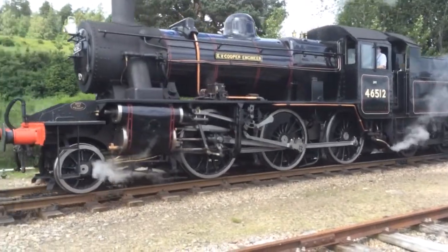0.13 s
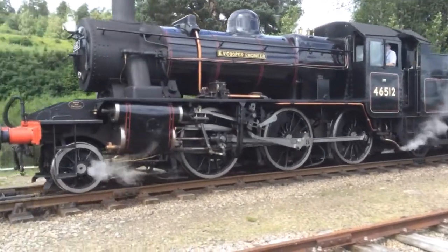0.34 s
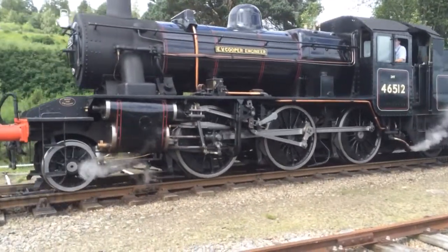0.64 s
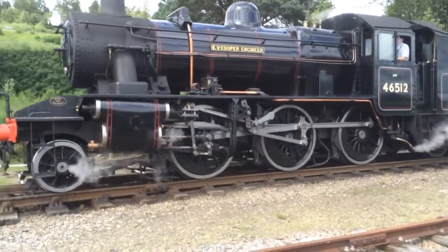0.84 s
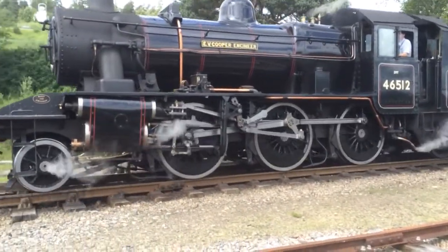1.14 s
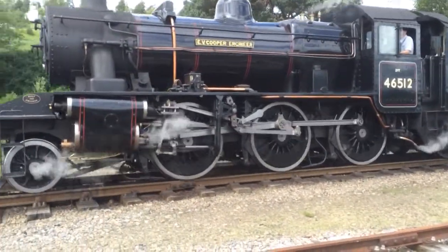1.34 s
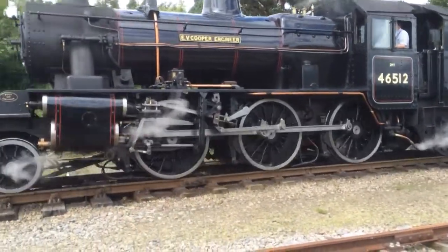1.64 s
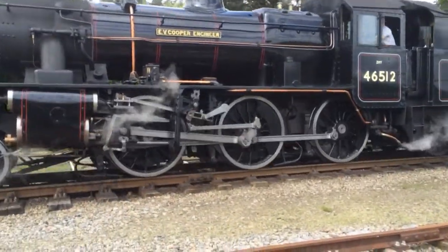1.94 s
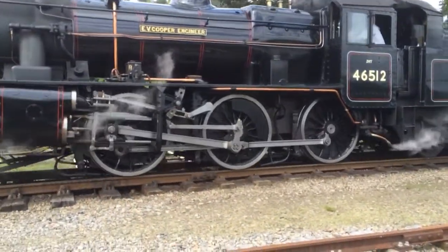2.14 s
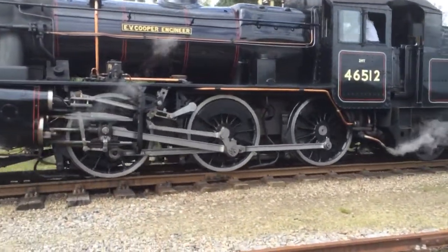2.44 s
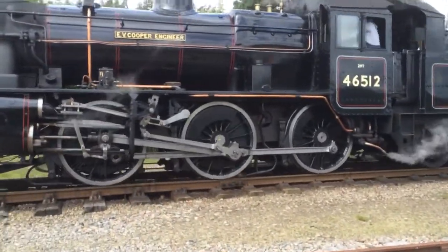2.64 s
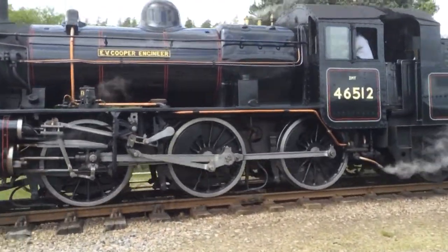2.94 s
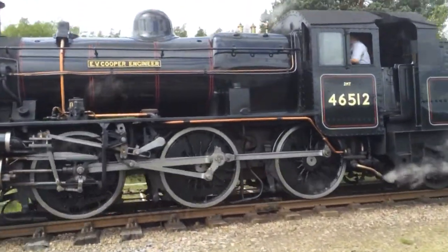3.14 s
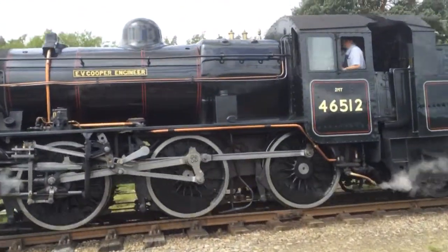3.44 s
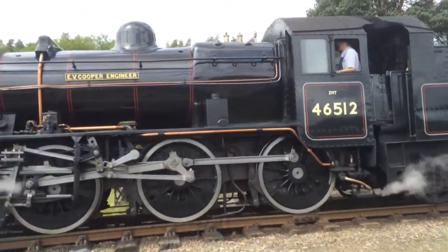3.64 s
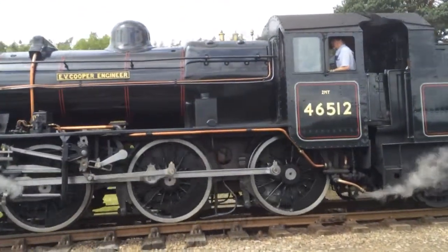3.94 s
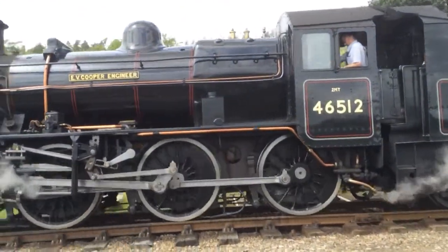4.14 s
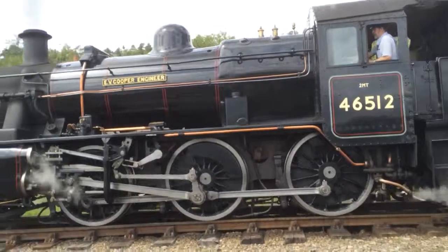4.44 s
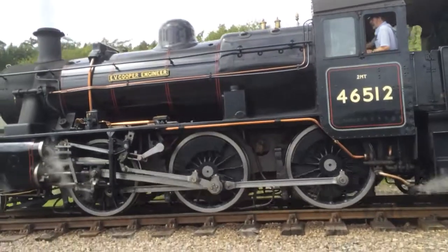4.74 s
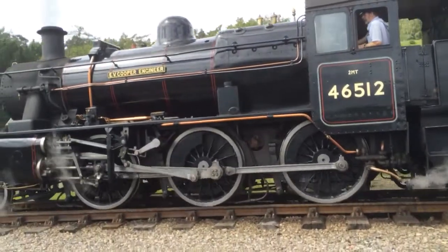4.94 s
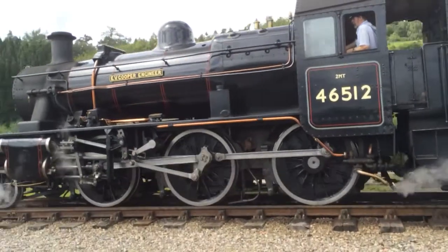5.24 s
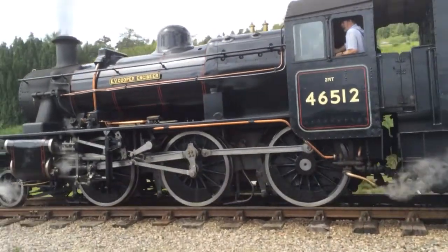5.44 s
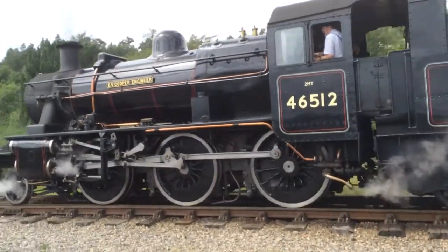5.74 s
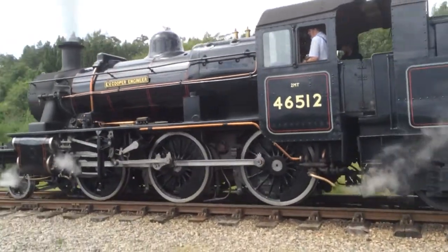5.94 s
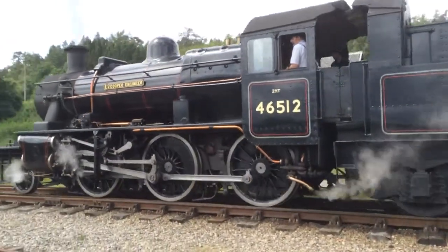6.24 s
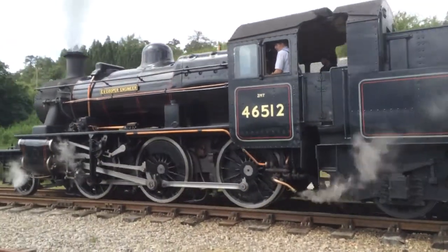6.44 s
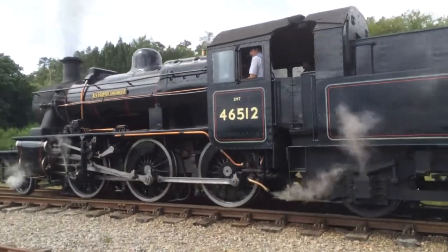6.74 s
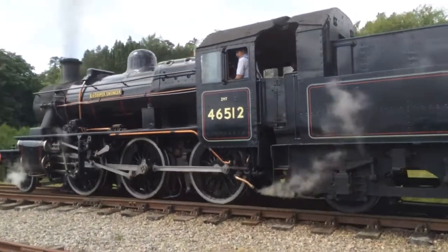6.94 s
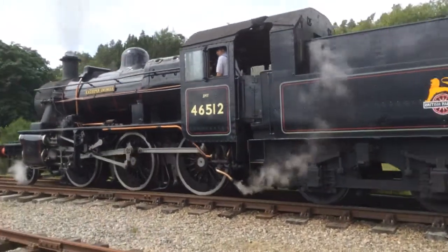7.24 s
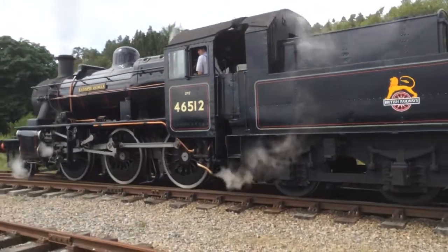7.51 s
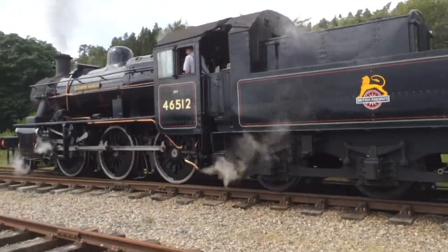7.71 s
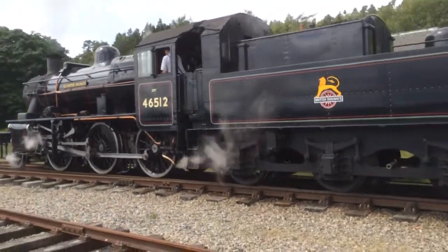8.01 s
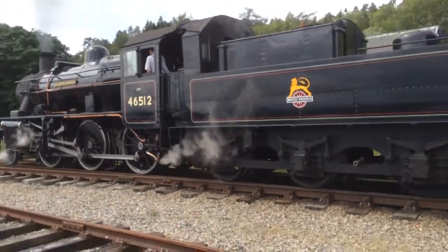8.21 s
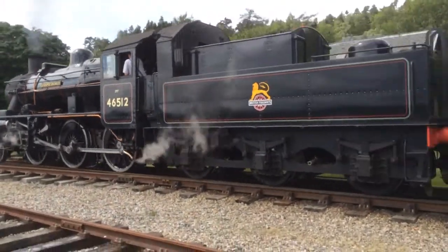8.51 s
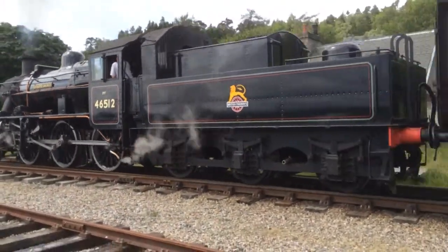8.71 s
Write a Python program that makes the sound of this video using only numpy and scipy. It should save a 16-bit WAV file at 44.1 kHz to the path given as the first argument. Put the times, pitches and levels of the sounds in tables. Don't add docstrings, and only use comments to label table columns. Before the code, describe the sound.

Outdoors beside the track, a steam locomotive gets under way. Hissing steam swells before each hollow, booming chuff, which roars briefly and echoes. Beats quicken from about three in two seconds to more than two a second. Metal rods clank and thin leaks whistle early on; low wheel rumble continues. The chimney gradually draws away, losing its boom while the blasts turn rougher and airier. Single-channel, close microphone, loud beats flattened.

```python
import sys
import numpy as np
from scipy import signal
from scipy.fft import rfft, irfft, next_fast_len
from scipy.io import wavfile
from scipy.ndimage import uniform_filter1d, minimum_filter1d, map_coordinates

SR = 44100
rng = np.random.default_rng(int(sys.argv[2]) if len(sys.argv) > 2 else 0)


def nominal_scale(level):
    x = np.asarray(level, float) / 20
    return 10 ** x


def to_wav(sig):
    pcm = np.clip(np.atleast_2d(sig), -1, 1) * 32767
    pcm = np.round(pcm).astype(np.int16)
    wavfile.write(sys.argv[1], SR, pcm.T)


N = 391166

# length in seconds, chimney note in dB, roar in dB, jet edge in dB,
# lean of the roar to its end in dB.
BEATS = [(.16, -11.5, -14, -29.5, 1), (.168, -10.5, -15, -31, 0), (.148, -10.5, -15.5, -29.5, -2),
         (.152, -13, -12.5, -27.5, 0), (.163, -12.5, -13.5, -29.5, .8), (.148, -9.5, -19, -32.5, 1.5),
         (.164, -10.5, -17, -28.5, -1), (.162, -12.5, -17.5, -28.5, -2.5), (.158, -13.5, -17.5, -27.5, -2),
         (.16, -13, -16.5, -26.5, .8), (.16, -12, -18, -25.5, 0), (.152, -17.5, -14.5, -25.5, 1.5),
         (.14, -17, -15.5, -24, 0), (.128, -21, -14.5, -25, -2.5), (.128, -22.5, -15.5, -19.5, -.8),
         (.125, -22, -14.5, -22.5, -2), (.112, -24, -13.5, -22.5, -1.5)]
# time in seconds, hot note in Hz, push in dB.
PORTS = [(.316, 198.4, -25), (1.005, 200.2, -19), (1.663, 189, -30), (2.303, 192.2, -27), (2.898, 204, -14),
         (3.472, 203.2, -14.5), (3.985, 195.1, -27), (4.522, 202, -20), (5.004, 205.6, -16),
         (5.508, 202.7, -12.5), (5.994, 192.2, -20), (6.486, 222.1, -14), (6.944, 213.4, -12),
         (7.396, 223, -13.5), (7.838, 212.2, -22), (8.274, 220, -19), (8.69, 212, -31)]
# delay in seconds, share of the length held, rise in dB/s, fall in dB/s,
# arch in dB, echo in dB, echo fall in dB/s, share of the lean.
NOTE_SHAPE = (.006, 1.03, 1300, 340, 1.2, -21.5, 95, .1)
ROAR_SHAPE = (.012, .77, 950, 265, 3.3, -24.5, 92, .95)
JET_SHAPE = (.021, .83, 490, 390, 5.6, -23.5, 60, .55)
# time of full flow in seconds, hiss in dB,
# chimney draught in dB.
PUFFS = [(.1, -40.5, -24), (.81, -39.5, -37), (1.52, -40.5, -34), (2.14, -38.5, -35), (2.79, -38.5, -31),
         (3.39, -38.5, -39), (3.93, -41, -38), (4.47, -43.5, -42), (4.98, -46.5, -39), (5.46, -45, -43),
         (5.96, -46.5, -40), (6.45, -46, -43), (6.91, -47, -40), (7.36, -46, -42), (7.81, -47, -42),
         (8.24, -48, -42), (8.66, -52, -42)]
# time in seconds, note in dB, roar in dB, jet edge in dB, hiss in dB.
IDLE = [(0, -45.5, -51.5, -57.5, -49.5), (4.5, -45.5, -53.5, -57.5, -50), (8.87, -51, -56, -58, -53)]
# time in seconds, level in dB.
JET_HISS = [(3, -13.5), (8, -10.4)]
# frequency in Hz, density in dB per Hz.
ROAR_NEAR = [(24, -57), (40, -45), (65, -14), (102, -23.5), (155, -5), (178, 5.5), (254, -6), (316, -20),
             (408, -10), (544, -19), (603, -17), (937, -18.5), (1150, -24.5), (1510, -20.5), (2300, -34.5),
             (2990, -64), (5060, -120)]
# frequency in Hz, density in dB per Hz.
ROAR_FAR = [(24, -55), (40, -11.5), (133, -4), (214, 6), (272, -0.5), (356, -4), (500, -9.5), (623, -7),
            (751, -18), (921, -10.5), (1250, -16), (1460, -14), (1940, -17), (2190, -26), (2300, -30.5),
            (2990, -24), (5060, -120)]
# time in seconds, share of the far colour from 0 to 1.
PASSING = [(3, 0), (8, 1)]
# frequency in Hz, density in dB per Hz.
JET = [(1290, 0), (2200, -12), (2400, -3), (2630, -4), (3340, 0), (4280, -5), (4790, -11.5), (6430, -12),
       (9000, -23), (11700, -43), (19800, -120)]
# frequency in Hz, density in dB per Hz.
HISS = [(1470, 1), (2500, -2.5), (2720, -5), (2940, -4.5), (3270, -4), (4770, -1), (9180, -3),
        (10500, -4.5), (14200, -6.5), (15700, -10)]
# frequency in Hz, width in Hz, level in dB.
ORIFICE = [(3915, 50, 1), (5920, 70, 3), (6370, 150, -1), (8880, 70, 3), (9040, 70, 4)]
# time in seconds, level in dB.
ORIFICE_FADE = [(.6, -3), (1.2, 2), (3.2, 1), (4.6, -10), (5.5, -24)]
# time in seconds, peak in dB, t60 in seconds.
CLANKS = [(1.527, -15, 0.12), (1.537, -17, 0.12), (1.55, -20, 0.1), (2.643, -22.5, 0.097),
          (2.697, -29, 0.1), (1.85, -26, 0.25), (1.63, -24, 0.2), (3.72, -23, 0.13), (4.334, -31, 0.15),
          (4.987, -23, 0.1), (5.847, -18, 0.093), (6.663, -38, 0.1)]
# frequency in Hz, density in dB per Hz.
ROD = [(120, -38), (200, -12), (407, 2.5), (966, -5.5), (1560, -2.5), (3220, -16), (4660, -33), (6060, -42),
       (8000, -19), (10400, -55), (17600, -120)]
# start in seconds, end in seconds, frequency in Hz, width in Hz, level in dB.
WHISTLES = [(.05, 0.31, 1490, 64.81, -51), (.78, 1.3, 1555, 55.56, -47), (1.399, 2.1, 1542, 75.6, -51),
            (2.099, 2.35, 1550, 45, -44), (2.62, 2.95, 1530, 49.6, -47.5), (3.3, 3.55, 1525, 66.93, -52),
            (3.6, 5, 1537, 64.81, -58), (4.652, 5.05, 1475, 37.04, -57), (5.15, 5.3, 1526, 55.56, -53),
            (0, 2.5, 2780, 48, -59), (7.5, 8.6, 2460, 80, -56.5), (6.655, 6.7, 3000, 90, -48),
            (7.95, 8.2, 1340, 30, -58), (1.842, 1.892, 1600, 380, -36.5), (1.86, 1.9, 2250, 90, -50),
            (3.36, 3.4, 950, 60, -52)]
# time in seconds, level in dB.
WHEELS = [(0.0, -45), (0.34, -40), (0.57, -48.5), (1.04, -37), (1.26, -56), (1.5, -44), (1.7, -32),
          (1.98, -42.5), (2.96, -40.5), (3.14, -46), (4.67, -43.5), (5.44, -44), (5.53, -47), (6.13, -37),
          (6.25, -42.5), (8.27, -40.5), (8.72, -40), (8.87, -38)]
# frequency in Hz, density in dB per Hz.
RUMBLE = [(12, -61), (20, -3), (119, 0.5), (150, -12), (173, -2.5), (189, -18.5), (200, -22), (260, -27),
          (440, -120)]


def unit(x):
    return x / np.sqrt(np.mean(x ** 2) + 1e-20)


def curves(rows):
    time_s, *columns = np.transpose(rows)
    return [np.interp(np.arange(N) / SR, time_s, column) for column in columns]


def wobble(rate_hz, size=N):
    knots = rng.standard_normal(int(N * rate_hz / SR) + 4)
    return map_coordinates(knots, [np.arange(size) * rate_hz / SR])


def filtered(x, response):
    m = next_fast_len(N + 8192)
    return irfft(rfft(x, m) * response(np.fft.rfftfreq(m, 1 / SR)), m)[:N]


def gain_of(points):
    point_hz, db = np.transpose(points)
    return lambda hz: nominal_scale(np.interp(np.log(hz + 1), np.log(point_hz + 1), db))


def rush(spectrum, patchy_db, lumpy_db, eddies_hz, size=6):
    lumpy = rng.standard_normal(N) * nominal_scale(lumpy_db * wobble(eddies_hz))
    z = signal.stft(lumpy, nperseg=512)[2]
    field = uniform_filter1d(rng.standard_normal(z.shape), size, 0)
    field = uniform_filter1d(field, size + 1, 1)
    patchy = signal.istft(z * nominal_scale(patchy_db * unit(field)), nperseg=512)[1][:N]
    return unit(filtered(patchy, gain_of(spectrum)))


def note(hz, width_hz, steady):
    noise = wobble(width_hz, size=len(hz)) + 1j * wobble(width_hz, size=len(hz))
    drift = (steady + noise) / np.sqrt(steady ** 2 + 2)
    return unit(np.real(drift * np.exp(2j * np.pi * np.cumsum(hz) / SR)))


def exhaust():
    note_db, roar_db, jet_db, _ = controls()
    flutter_db = 1.5 * wobble(22)
    roar_db, jet_db = roar_db + flutter_db, jet_db + flutter_db

    far = np.clip(curves(PASSING)[0], 0, 1)
    near_roar = rush(ROAR_NEAR, patchy_db=2.6, lumpy_db=2.3, eddies_hz=110, size=2)
    far_roar = rush(ROAR_FAR, patchy_db=2.2, lumpy_db=1.6, eddies_hz=110, size=2)
    roar = np.sqrt(1 - far) * near_roar + np.sqrt(far) * far_roar
    chimney_band = filtered(roar, lambda hz: np.exp(-((hz - 190) / 55) ** 2))
    roar = roar - (.8 - 0.3 * far) * chimney_band
    roar = roar / np.std(filtered(roar, lambda hz: hz > 300))
    jet = rush(JET, patchy_db=1.5, lumpy_db=1.5, eddies_hz=130, size=3)

    t = np.arange(N) / SR
    port = np.maximum(np.searchsorted(np.transpose(PORTS)[0], t + .02) - 1, 0)
    opened_s, hot_hz, _ = np.transpose(PORTS)[:, port]
    since_s = t - opened_s
    idle_hz, sag_hz = 188, 7
    rise_hz = (hot_hz - idle_hz) * np.exp(-(since_s / .13) ** 2)
    note_hz = idle_hz + rise_hz - sag_hz * np.exp(-((since_s - .17) / .07) ** 2)
    boom = note(note_hz, width_hz=52, steady=0.86)
    shut = np.clip((since_s + .02) / .014, .25, 1)

    upper = filtered(roar, lambda hz: hz ** 2 / (hz ** 2 + 800 ** 2))
    bright_db = np.clip(.5 * (jet_db - roar_db + 10.5), -9, 4)
    bright_db = bright_db - 4.1 * np.exp(-(since_s / 0.021) ** 2)
    roar = roar + (nominal_scale(bright_db) - 1) * upper
    chimney = nominal_scale(note_db + 1.1 - 3.2 * far) * boom + nominal_scale(roar_db + 2.0) * roar
    return shut * chimney + nominal_scale(jet_db + 2.8) * jet


def swells(start_s, end_s, top_db, rise_db_per_s, fall_db_per_s, arch_db=0.0, lean_db=0.0):
    t = np.arange(N * 1000 // SR + 2)[:, None] / 1000
    across = np.clip((2 * t - start_s - end_s) / (end_s - start_s), -1, 1)
    rise_db = rise_db_per_s * np.maximum(start_s - t, 0)
    fall_db = fall_db_per_s * np.maximum(t - end_s, 0)
    db = top_db - rise_db - fall_db - arch_db * across ** 2 + lean_db * across
    return np.sum(nominal_scale(2 * db), axis=1)


def blast(top_db, shape):
    late_s, held, rise, fall, arch_db, echo_db, echo_fall, leans = shape
    opened_s = np.transpose(PORTS)[0]
    length_s, *_, lean_db = np.transpose(BEATS)
    start_s, end_s = opened_s + late_s, opened_s + held * length_s
    direct = swells(start_s, end_s, top_db, rise, fall, arch_db, leans * lean_db)
    return direct + swells(start_s, end_s, top_db + echo_db, rise, echo_fall)


def controls():
    length_s, note_db, roar_db, jet_db, _ = np.transpose(BEATS)
    full_s, hiss_db, draught_db = np.transpose(PUFFS)
    puff_end_s = np.transpose(PORTS)[0] + .7 * length_s

    def puff(db):
        return swells(full_s, puff_end_s, db, rise_db_per_s=120, fall_db_per_s=170)

    jet, roar = blast(jet_db, JET_SHAPE), blast(roar_db, ROAR_SHAPE)
    dip = nominal_scale(2 * -3.2 * roar / (roar + nominal_scale(2 * -22)))
    fizz = blast(jet_db + np.interp(full_s, *np.transpose(JET_HISS)), JET_SHAPE)
    powers = [
        blast(note_db, NOTE_SHAPE) + puff(draught_db),
        roar + puff(draught_db - 13),
        jet + puff(hiss_db - 11),
        fizz + dip * puff(hiss_db),
    ]
    ms = np.arange(N) * 1000 / SR
    levels_db = []
    for power, idle_db in zip(powers, curves(IDLE)):
        moving = np.interp(ms, np.arange(len(power)), power)
        levels_db.append(10 * np.log10(moving + nominal_scale(2 * idle_db)))
    return levels_db


def thumps():
    push, t = np.zeros(N + SR), np.arange(SR // 5) / SR
    u = t / 0.0048
    pulse = u * (2 - u) * np.exp(-u) * 2
    for opened_s, hot_hz, db in PORTS:
        ring = nominal_scale(3 - 60 * t / 0.19) * (1 - np.exp(-t / 0.015)) * np.sin(2 * np.pi * hot_hz * t)
        push[round((opened_s - .006) * SR):][:len(t)] -= nominal_scale(db) * (pulse + ring)
    return push[:N]


def leak():
    hiss = rush(HISS, patchy_db=1.34, lumpy_db=0.6, eddies_hz=40)

    def resonances(hz):
        total = 0
        for k, (centre_hz, width_hz, db) in enumerate(ORIFICE):
            damping = 1j * hz * width_hz
            total = total + (-1) ** k * nominal_scale(db) * damping / (centre_hz ** 2 - hz ** 2 + damping)
        return total

    ringing = filtered(hiss[::-1], resonances)
    return nominal_scale(controls()[3] + 2.5) * (hiss + nominal_scale(curves(ORIFICE_FADE)[0]) * ringing)


def rods():
    blows, t = np.zeros(N + SR), np.arange(SR // 4) / SR
    tick = 0.7 * nominal_scale(-60 * t / .012)
    for start_s, db, t60_s in CLANKS:
        rattle = nominal_scale(-60 * t / np.clip(t60_s, .03, .3))
        burst = rng.standard_normal(len(t)) * (rattle + tick)
        blows[round(start_s * SR):][:len(t)] += nominal_scale(db + 1.5) * burst
    return filtered(blows[:N], gain_of(ROD))


def whistles():
    tones = np.zeros(N + SR)
    for start_s, end_s, hz, width_hz, db in WHISTLES:
        u = np.linspace(0, 1, round((end_s - start_s) * SR))
        soft = np.clip(np.minimum(u, 1 - u) / 0.13, 0, 1)
        pitch_hz = hz * (1 + .005 * wobble(7.7, size=len(u)))
        tone = note(pitch_hz, width_hz, steady=0.75)
        tones[round(start_s * SR):][:len(u)] += nominal_scale(db) * soft * tone
    return tones[:N]


def wheels():
    level_db = curves(WHEELS)[0] + 1.5 * wobble(5)
    return nominal_scale(level_db) * rush(RUMBLE, patchy_db=1.5, lumpy_db=1.5, eddies_hz=14)


def scene():
    return (exhaust() + thumps() + leak() + rods() + whistles() + wheels())[None]


def roll_off(x):
    return signal.sosfilt(signal.butter(12, 15890, fs=SR, output="sos"), x)


def record(dry):
    top_hz = 15295
    heard = filtered(dry[0], lambda hz: hz ** 2 / (hz ** 2 + 37 ** 2) * (hz < top_hz))[None]
    need = np.minimum(1, .71 / (np.abs(heard) + 1e-9))
    held = minimum_filter1d(need, size=441, axis=1)
    gain = uniform_filter1d(held, size=221, axis=1)
    mix = filtered((heard * gain)[0], lambda hz: hz < top_hz)[None]
    return roll_off(mix)


dry = scene()
out = record(dry)
to_wav(out)
```